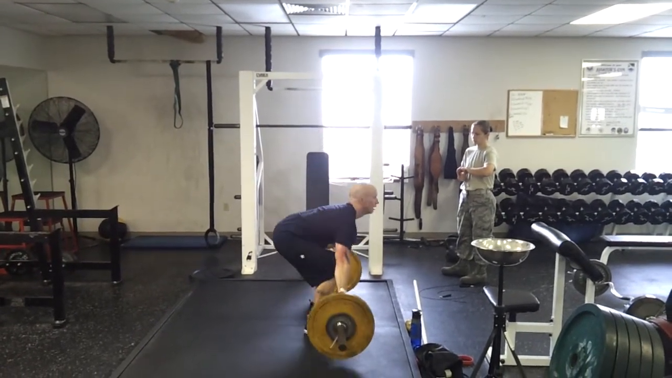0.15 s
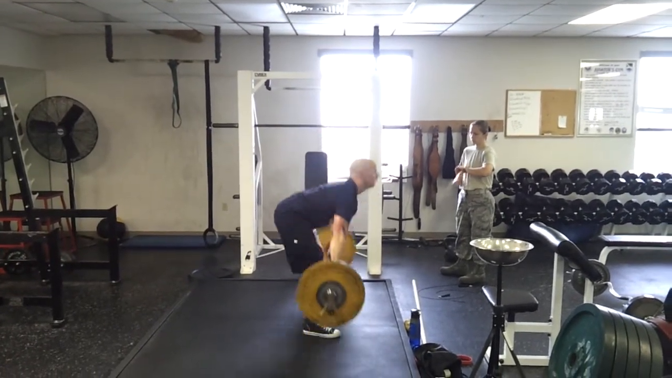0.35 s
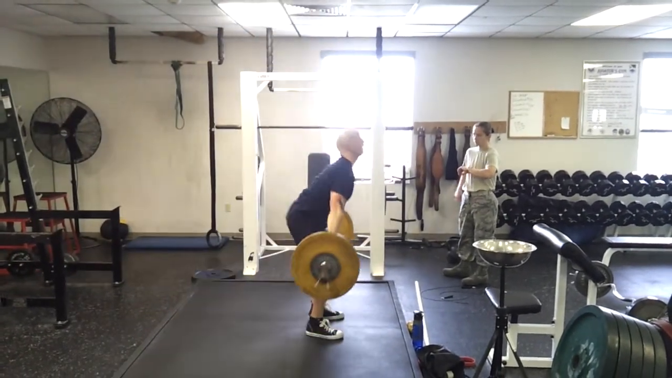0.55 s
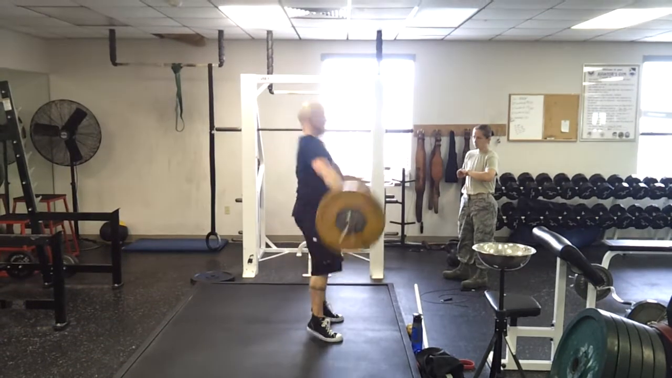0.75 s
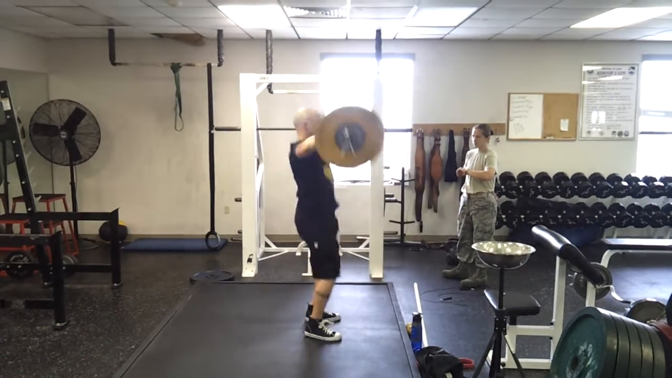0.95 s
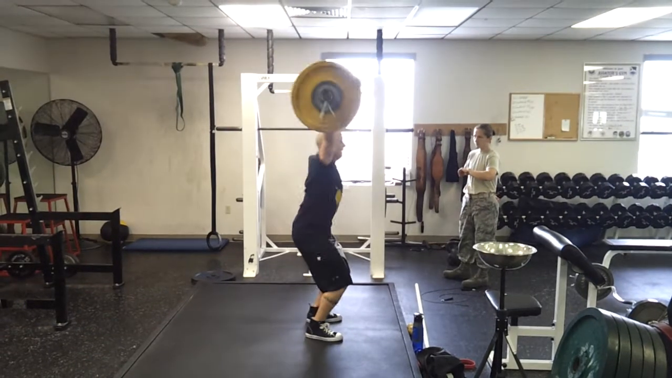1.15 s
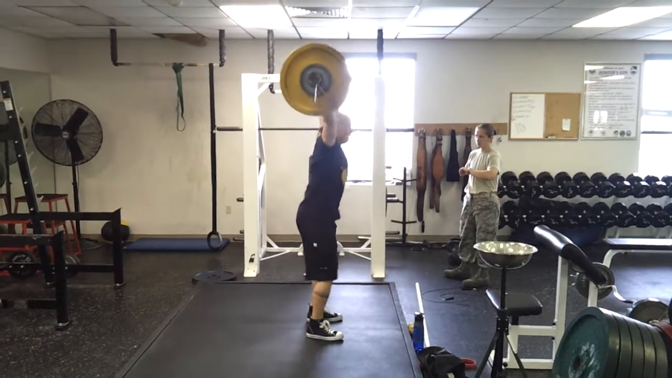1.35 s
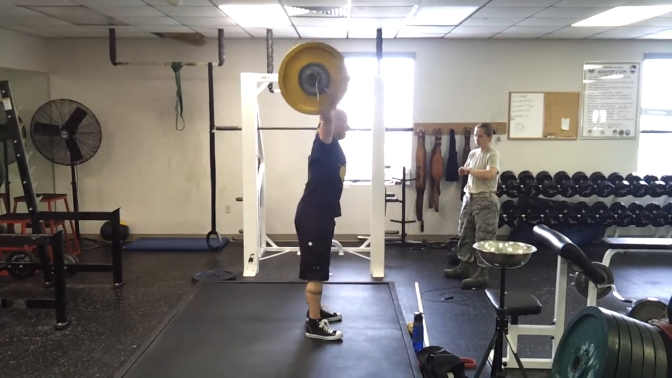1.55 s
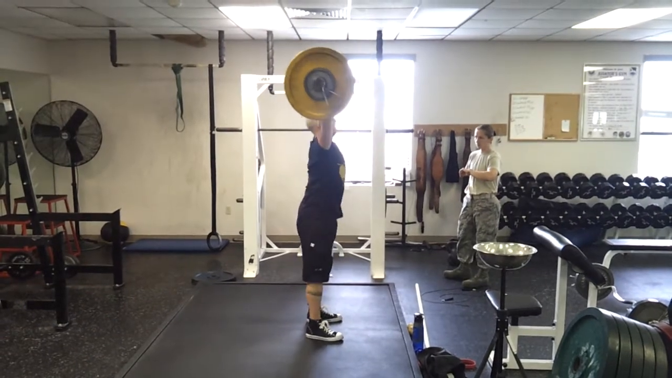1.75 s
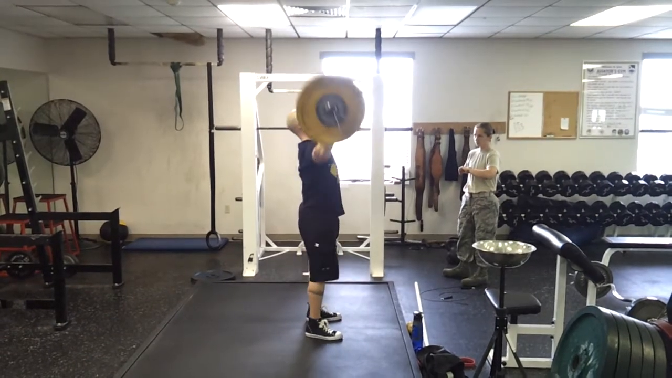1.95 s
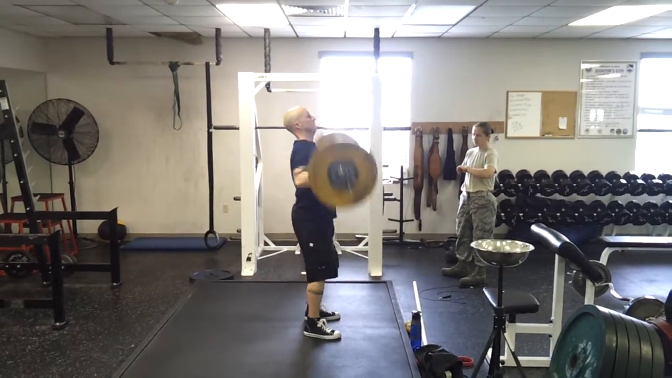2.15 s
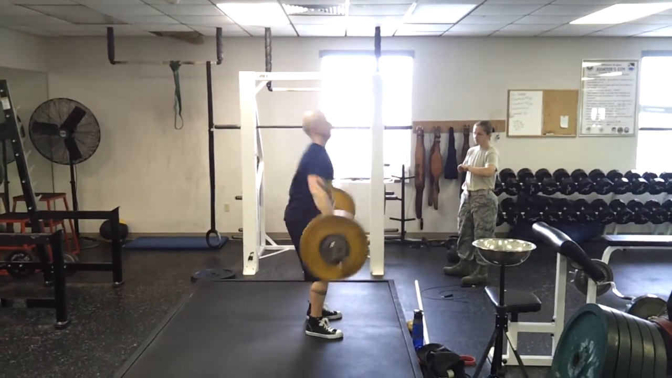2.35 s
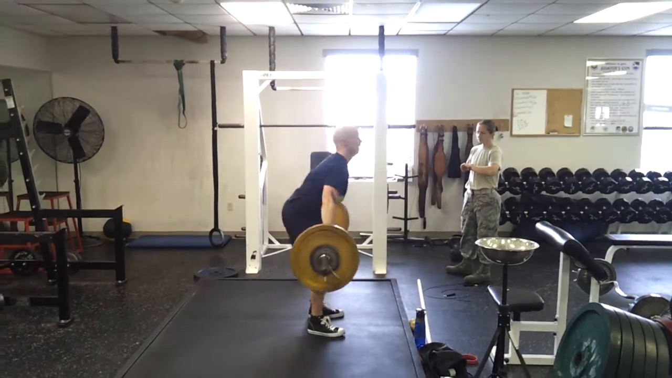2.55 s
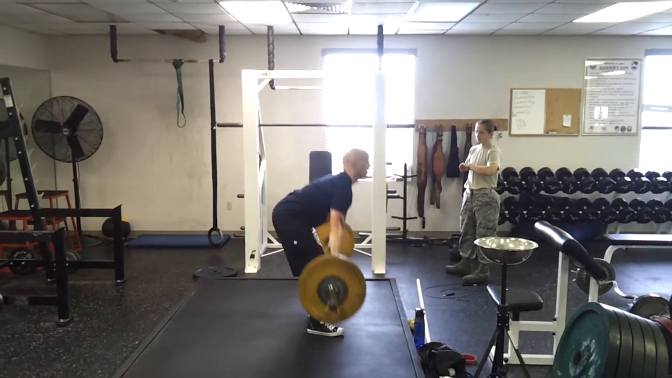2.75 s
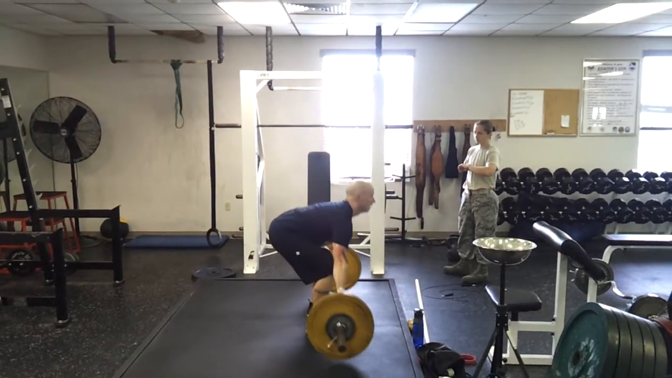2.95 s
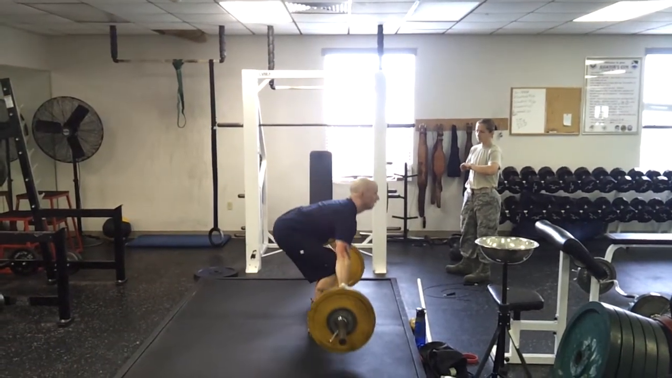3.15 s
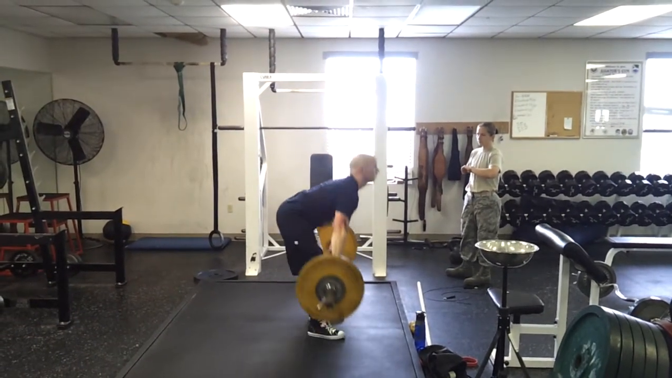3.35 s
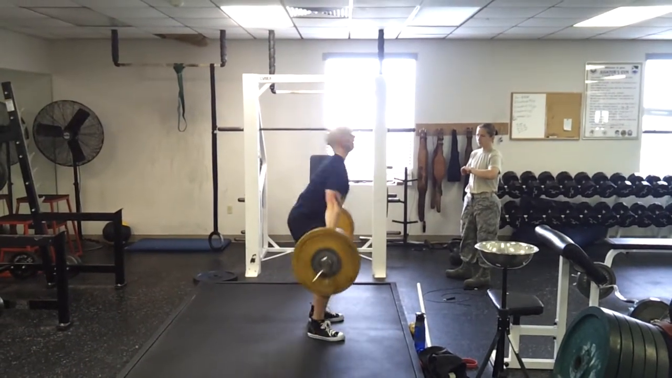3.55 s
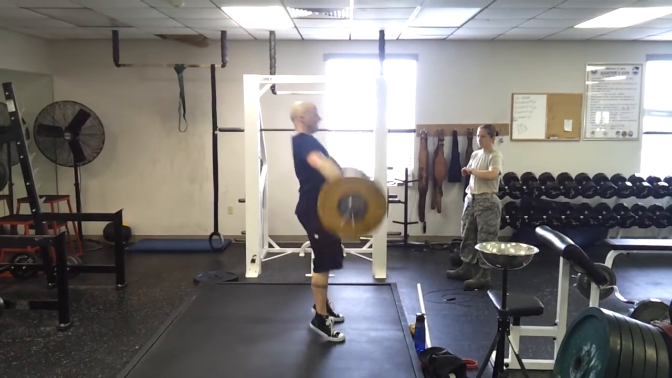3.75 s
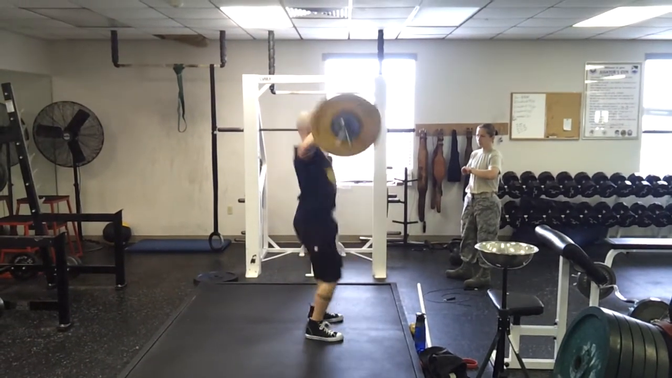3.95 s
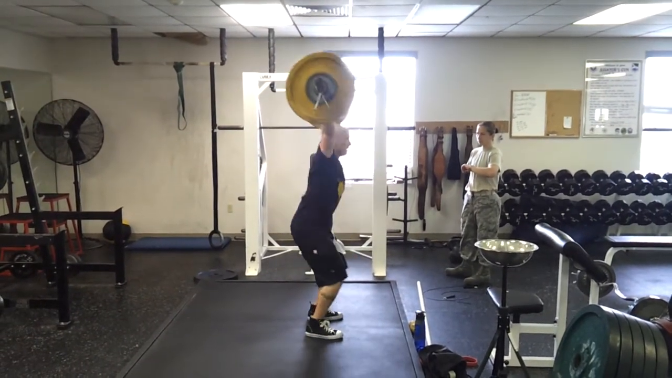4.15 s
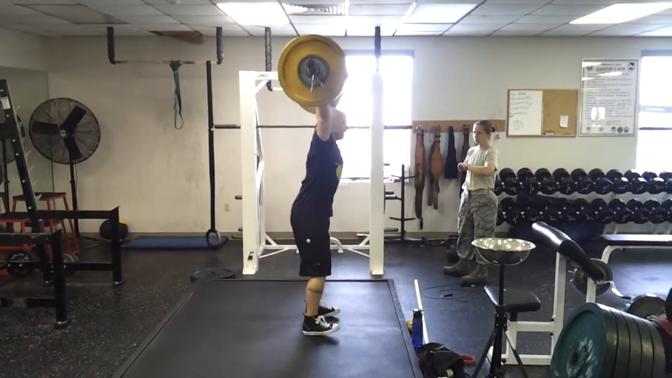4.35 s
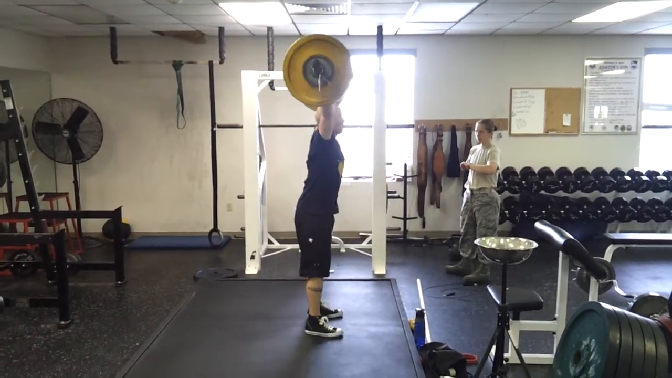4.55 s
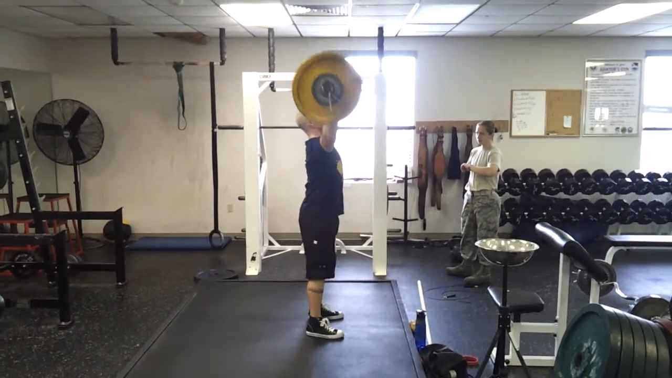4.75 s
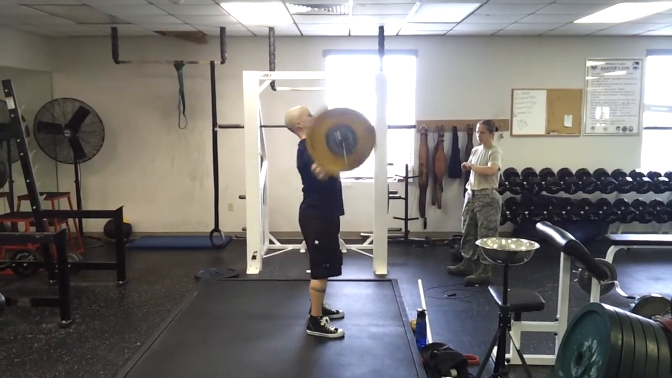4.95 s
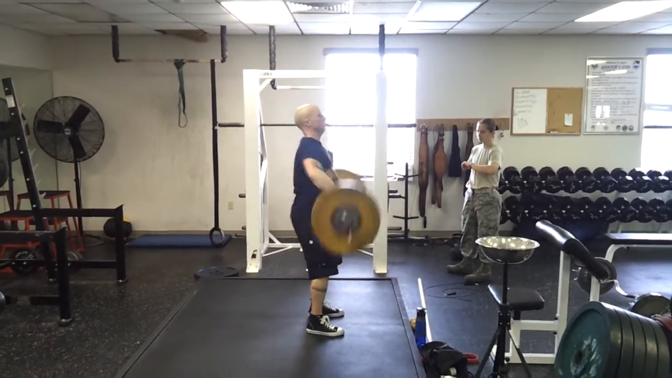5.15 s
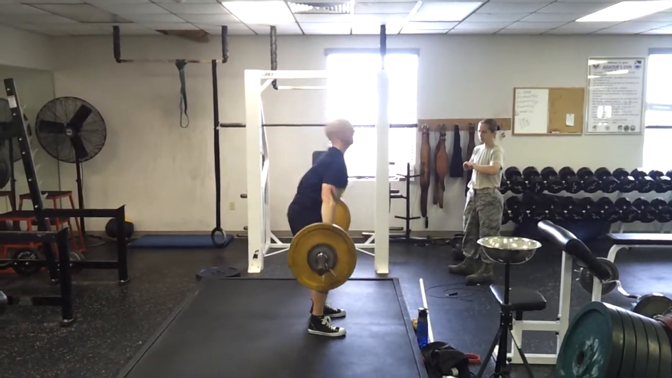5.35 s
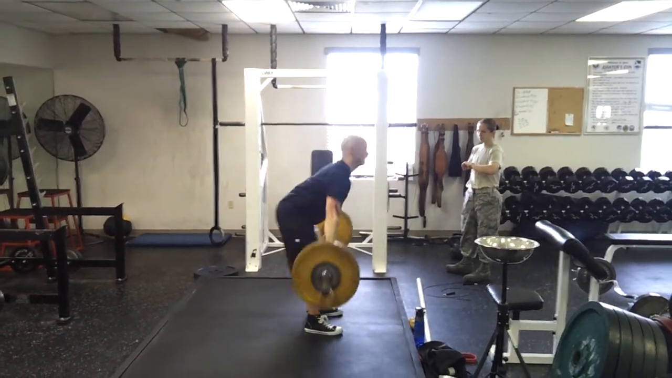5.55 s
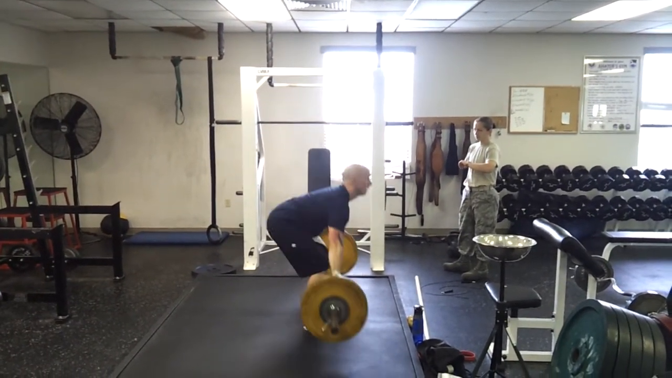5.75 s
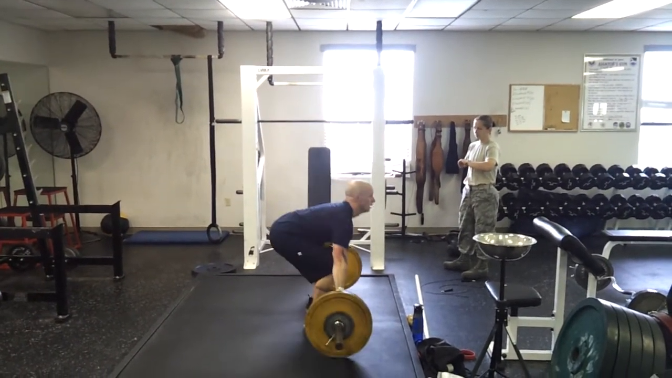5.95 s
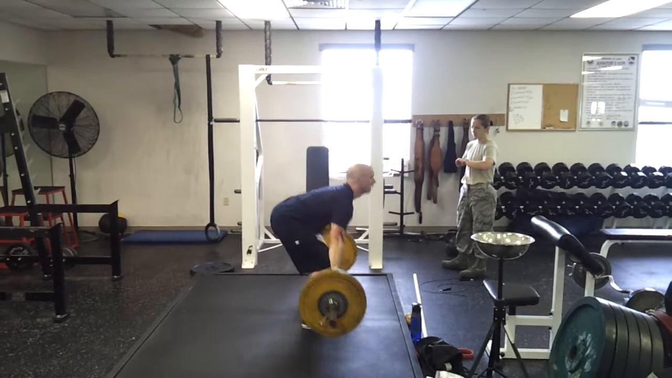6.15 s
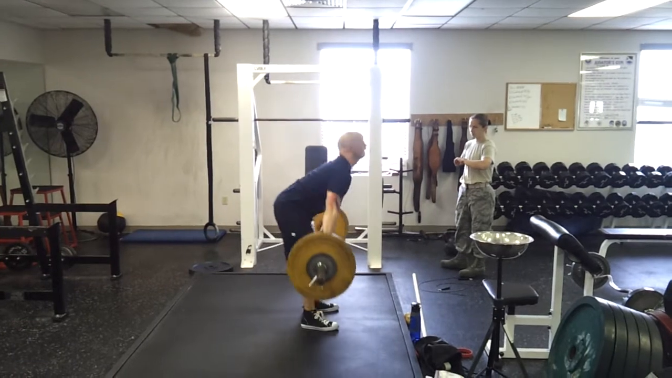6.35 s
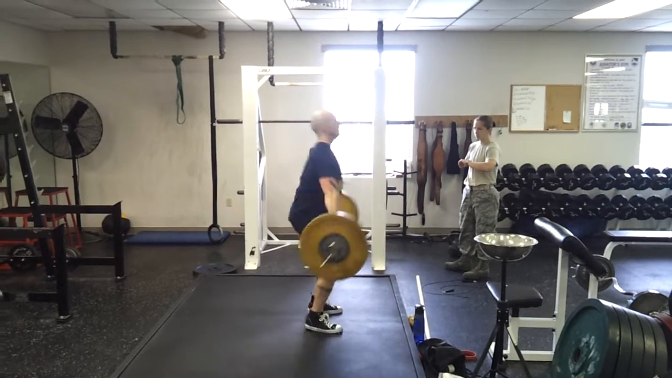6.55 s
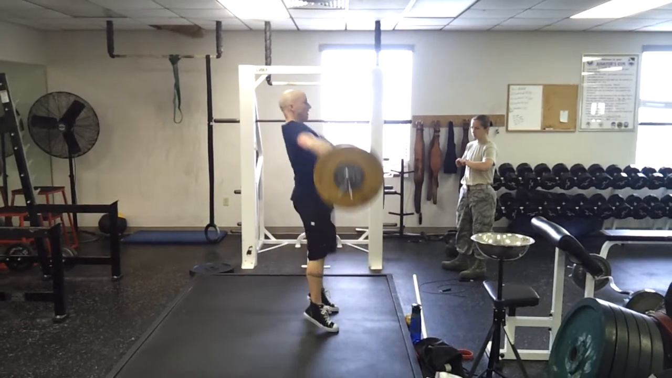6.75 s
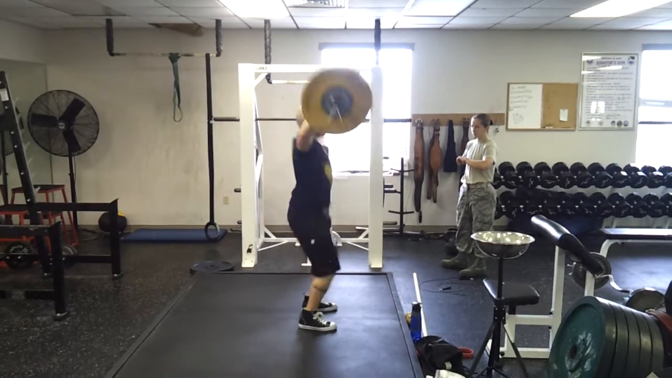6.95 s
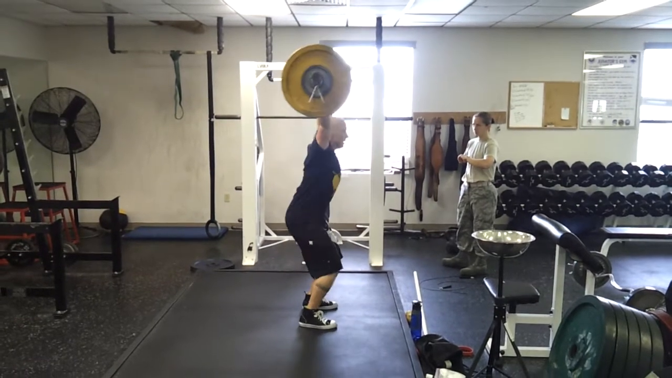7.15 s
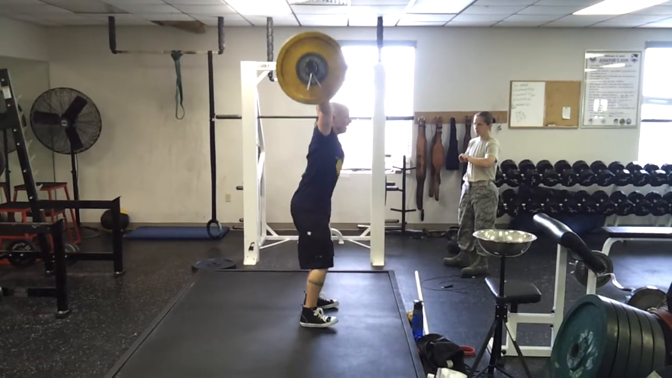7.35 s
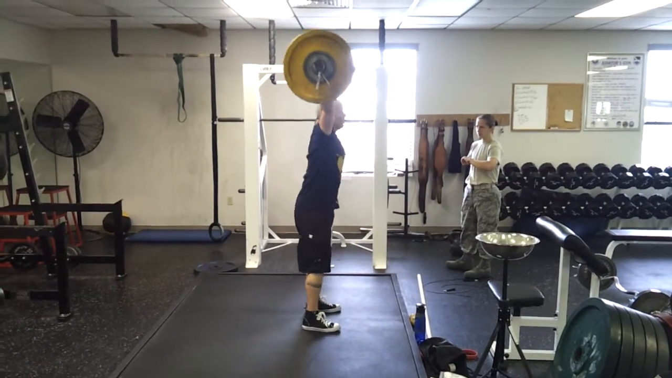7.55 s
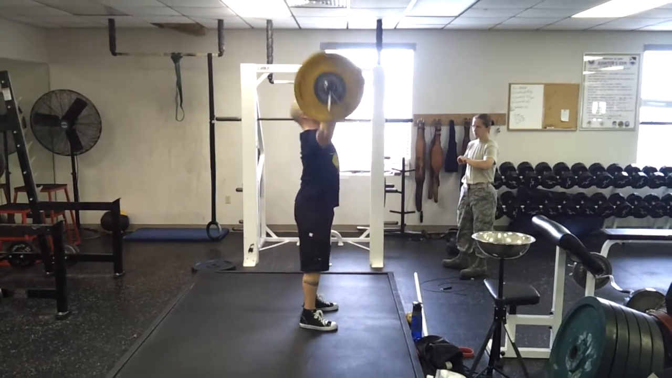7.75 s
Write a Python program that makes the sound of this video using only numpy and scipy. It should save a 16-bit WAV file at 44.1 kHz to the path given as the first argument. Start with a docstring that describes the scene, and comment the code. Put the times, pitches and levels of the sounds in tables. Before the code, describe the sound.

In a hard, reverberant gym, a barbell slams onto rubber at the start, then twice more about three seconds apart. Each double crash overloads the microphone and rebounds with bright steel clatter. Between slams come a soft hip knock, plate rattles overhead and on the way down, pinging collars and brief squeaks. Ventilation rushes and hums steadily beneath.

```python
"""A rubber-plated barbell crashes on a rubber platform, loud enough to overload the microphone.
The hard-walled gym answers; the barbell is snatched three times. Filtered noise rattles and rings the steel.
Plates slide, knock at the hips and rattle overhead and on the way down; collars ping, the bar note beats.
Sleeves whistle as they slip, stray plates clink, and ventilation rushes and hums throughout."""
import sys
import numpy as np
from scipy import signal
from scipy.fft import rfft, irfft
from scipy.io import wavfile

SR = 44100
rng = np.random.default_rng(int(sys.argv[2]) if len(sys.argv) > 2 else 0)


def master(y):
    """Save y as 16-bit WAV."""
    cut = np.clip(np.atleast_2d(y).T, -1, 1)
    pcm = np.round(cut * 32767)  # scale
    wavfile.write(sys.argv[1], SR, pcm.astype(np.int16))


N = 343539
T_S = np.arange(SR) / SR  # the second that follows a blow
GRID_HZ = abs(np.fft.fftfreq(8192, 1 / SR))

# barbell landings, one end then the other: t/s, far-end lag/s, far-end level/dB, rebound level/dB,
# rebound length/s, bar note level/dB
DROPS = [(.060, 0.03, -5, -8, 0.048, -31.5), (3.015, .023, -6, -7, 0.024, -27.5),
         (5.958, .019, -3.5, -14, .07, -30.5)]
# bar bumped off the hips: t/s, knock level/dB, knock length/s, chatter level/dB, slide level/dB,
# collar level/dB, bar note level/dB
BUMPS = [(.636, -25.5, 0.0078, -38, -43.5, -29, -42), (3.602, -28, 0.0057, -32.5, -39.5, -30.5, -39),
         (6.574, -30, 0.017, -33.5, -38, -38, -49)]
# arms stopping the bar, overhead or on the way down: t/s, far-end lag/s, level/dB, rattle length/s,
# slide level/dB, near collar level/dB, far collar level/dB, bar note level/dB
JOLTS = [ (1.116, 0.017, -17.5, 0.049, -48, -28, -22.5, -29.5),
         (2.176, 0.015, -13.5, 0.047, -57, -26, -22, -48), (2.560, .010, -27, 0.029, -47, -31.5, -47, -55),
         (4.086, .021, -19, 0.034, -40.5, -41, -44, -55), (5.075, .013, -18.5, 0.047, -50, -31, -21, -40.5),
         (5.499, 0.02, -30.5, 0.069, -45, -37.5, -59, -42.5),
         (7.089, 0.031, -23, 0.046, -57, -58, -53, -60)]
# a loose plate clinking alone: t/s, level/dB, length/s, tilt/(dB per octave)
CLINKS = [(0.958, -46.5, .035, -0.5), (3.002, -44, 0.0045, -7.5), (4.765, -48.5, 0.0064, 3.5),
          (5.745, -44.5, .01, -8), (7.058, -34.5, 0.018, 0), (7.401, -42.5, .023, 6)]
# short whistling tones from the bar, sleeve squeaks and one faint high ping at 3.743 s: t/s, length/s, f/Hz,
# level/dB
WHISTLES = [(3.743, .018, 8730, -46), (4.108, .013, 3210, -30.5), (6.293, 0.14, 9500, -44),
            (6.581, 0.18, 4390, -43), (6.64, 0.065, 4780, -48.5), (7.146, 0.069, 8700, -33),
            (7.339, 0.12, 3415, -44), (7.34, .09, 2440, -54), (7.352, .09, 4100, -51)]
# resonances of steel sleeves and plate hubs: f/Hz, width/Hz, relative level/dB
STEEL_MODES = [(1209, 82, 6.5), (1388, 53, 2), (1570, 51, 2), (2216, 48, 0.5), (2485, 70, 0),
               (2840, 160, 3.5), (3107, 86, 11), (3567, 77, 4), (4010, 75, 5.5), (4375, 36.2, 5),
               (4777, 55, 4), (5250, 31, 6), (5543, 78, 6), (5795, 28, 3.5), (6214, 47, 7), (6676, 86, 3),
               (7126, 61, 2.5), (7660, 49, 2.5), (7880, 50, 1.5), (8250, 34, 4), (8720, 98, 0.5),
               (9100, 220, 5.5), (9950, 40, 4.5), (10570, 39, 2.5), (10350, 89, -0.5), (10910, 58, 3.5),
               (11740, 13.35, -21.5)]
# dull clatter beneath the resonances: f/Hz, relative density/(dB per Hz)
CLATTER = [(100, -25.5), (400, -15.5), (850, -5.5), (1300, -15), (1800, -2.5), (3000, -3), (4500, -8),
           (7500, -16.5), (10000, -24.5), (12000, -3)]
# dull knock of the platform: f/Hz, relative density/(dB per Hz)
THUD = [(20, -13.5), (70, -1), (160, -2.5), (350, -3), (650, -6), (1000, -14), (2000, -29.5), (8000, -67.5)]
# bending note of the bar in two planes that beat: f/Hz, relative level/dB, t60/s
BAR_MODES = [(1387, -0.5, 1.48), (1386, -1.5, 0.74)]
# short collar ring: ratio to its pitch, width/Hz, relative level/dB
COLLAR_MODES = [(1, 150, 4.5), (0.96, 250, -8), (1.3, 120, -12.5)]
# decay of the room: f/Hz, t60/s
ROOM_T60 = [(100, 0.49), (500, 0.57), (1500, 0.52), (3000, 0.5), (6000, 0.54), (9000, 0.51), (12000, 0.4)]
# ventilation rush: f/Hz, relative density/(dB per Hz)
AIR = [(12, -29.5), (20, -2.5), (64, -2.5), (82, -7), (151, -8.5), (192, -12.5), (231, -10), (335, -11.5),
       (426, -13.5), (585, -15.5), (724, -18.5), (2890, -34), (3480, -36), (9050, -42), (11500, -40),
       (15000, -83), (22000, -120)]

# near end's level and length, far end's length, tilt in dB per octave
LAND_DB, LAND_S, CRASH_S, CRASH_TILT_DB_OCT = -6, .027, 0.043, 1.17
REBOUND_LAG_S, REBOUND_TILT_DB_OCT = .067, 2.8  # plates come down again, brighter
THUD_DB, THUD_LEAD_S = -26.5, .005  # rubber touches just before steel
DROP_COLLAR_DB, DROP_COLLAR_S, DROP_COLLAR_HZ = -9, .013, 9340
BUMP_TILT_DB_OCT, CHATTER_LAG_S, CHATTER_S, CHATTER_TILT_DB_OCT = -4.5, .021, 0.019, -0.5
BUMP_COLLAR_S, BUMP_COLLAR_HZ = 0.0092, 9360
SPIN_S, SPIN_HZ, SPIN_DB = 0.014, 4130, -39.5
# near end relative to the far end; its rattle length in lags
NEAR_DB, NEAR_TILT_DB_OCT, NEAR_LENGTH_LAGS = -7, -1.3, 1.32
EVEN_DB, TILT_PER_DB = -19.5, 0.17  # harder jolts are brighter, softer ones duller
JOLT_COLLAR_S, JOLT_COLLAR_HZ = .012, 9070
SLIDE_STEP_S, SLIDE_GROWTH_DB, SLIDE_S, SLIDE_TILT_DB_OCT = .028, 5, 0.049, -.5
AIR_DB, HUM_HZ, HUM_DB = -36, 59.3, -45  # RMS levels; the hum's before it wavers
INPUT_EDGE_HZ, OUTPUT_EDGE_HZ = 11750, 15900


def drops():
    """Each end thuds and crashes in turn; the rebound sets the bar singing."""
    out = np.zeros(N)
    for t_s, lag_s, far_db, rebound_db, rebound_s, note_db in DROPS:
        for at_s, db, length_s in (t_s, LAND_DB, LAND_S), (t_s + lag_s, far_db, CRASH_S):
            add(out, at_s - THUD_LEAD_S, platform(THUD_DB))
            add(out, at_s, plates(db, length_s, CRASH_TILT_DB_OCT))
        add(out, t_s, collar(DROP_COLLAR_DB, DROP_COLLAR_S, DROP_COLLAR_HZ))
        rebound = plates(rebound_db, rebound_s, REBOUND_TILT_DB_OCT)
        add(out, t_s + REBOUND_LAG_S, rebound + bar(note_db))
    return out


def jolts():
    """Near plates touch first, then far ones take the full stop; each end slaps its collar."""
    out = np.zeros(N)
    for t_s, lag_s, db, length_s, slide_db, near_collar_db, far_collar_db, note_db in JOLTS:
        tilt = TILT_PER_DB * (db - EVEN_DB)
        out += slide(t_s, slide_db)
        add(out, t_s, plates(db + NEAR_DB, NEAR_LENGTH_LAGS * lag_s, tilt + NEAR_TILT_DB_OCT))
        add(out, t_s + lag_s, plates(db, length_s, tilt) + bar(note_db))
        for at_s, collar_db in (t_s, near_collar_db), (t_s + lag_s, far_collar_db):
            add(out, at_s, collar(collar_db, JOLT_COLLAR_S, JOLT_COLLAR_HZ))
    return out


def bumps():
    """Plates slide during the pull, knock once at the hips and chatter as the spun sleeves chirp."""
    out = np.zeros(N)
    for t_s, db, length_s, chatter_db, slide_db, collar_db, note_db in BUMPS:
        out += slide(t_s, slide_db)
        add(out, t_s, plates(db, length_s, BUMP_TILT_DB_OCT))
        add(out, t_s, collar(collar_db, BUMP_COLLAR_S, BUMP_COLLAR_HZ))
        add(out, t_s, bar(note_db))
        add(out, t_s, sleeve(SPIN_DB, SPIN_S, SPIN_HZ))
        add(out, t_s + CHATTER_LAG_S, plates(chatter_db, CHATTER_S, CHATTER_TILT_DB_OCT))
    return out


def handling():
    """Stray clinks, squeaks and a faint high ping while the bar is carried."""
    out = np.zeros(N)
    for t_s, db, length_s, tilt_db_oct in CLINKS:
        add(out, t_s, plates(db, length_s, tilt_db_oct))
    for t_s, length_s, hz, db in WHISTLES:
        add(out, t_s, sleeve(db, length_s, hz))
    return out


def slide(knock_s, last_db, count=3):
    """Plates slip along the sleeve, louder and louder, up to a knock."""
    out = np.zeros(N)
    for k in range(count):  # backward from the last slip
        slip = plates(last_db - k * SLIDE_GROWTH_DB, SLIDE_S, SLIDE_TILT_DB_OCT)
        add(out, knock_s - (k + 1) * SLIDE_STEP_S, slip)
    return out


def plates(db, length_s, tilt_db_oct, free_db=-10, damping_hz_per_db=3):
    """A rattle rings the steel; only hard blows shake it free of the damping rubber."""
    steel = ring(STEEL_MODES, damping_hz_per_db * max(free_db - db, 0))
    tilt = shape([(750, -2 * tilt_db_oct), (12000, 2 * tilt_db_oct)])  # four octaves
    gain = np.hypot(shape(CLATTER), steel) * tilt
    return room(burst(colour(rattle(length_s), gain), db), wet_db=5.5)


def rattle(length_s, contacts_per_s=400, contact_t60_s=0.02, scrape=0.1):
    """Gritty contacts over a scrape: noise in a rising and falling envelope."""
    contacts = (rng.random(SR) < contacts_per_s / SR) * rng.exponential(1, SR)
    power = abs(convolve(contacts, dying(contact_t60_s) ** 2))
    rise = 1 - np.exp(-5 * T_S / length_s)
    fall = np.exp(-(T_S / length_s) ** 2)
    grit = np.sqrt(power / power.mean() + scrape)
    return rise * fall * grit * rng.standard_normal(SR)


def platform(db, thud_t60_s=0.084):
    """Rubber on rubber: decaying noise, a dull push with no ring."""
    push = rng.standard_normal(SR) * dying(thud_t60_s)
    return burst(room(colour(push, shape(THUD)), wet_db=3.5), db)


def collar(db, length_s, hz, slaps_per_s=1200):
    """A collar faces the microphone, so its bright buzzing ping is drier than the plates."""
    gain = ring([(ratio * hz, width_hz, level_db) for ratio, width_hz, level_db in COLLAR_MODES])
    return room(burst(colour(rattle(length_s, slaps_per_s), gain), db), wet_db=-2)


def bar(db, rise_s=0.0052):
    """One long beating note that flutters as the bar moves through the room."""
    note = sum(amp(level_db) * dying(t60_s) * np.exp(2j * np.pi * hz * T_S)
               for hz, level_db, t60_s in BAR_MODES)
    sway = 1 + .18 * (drift(SR, hz=16) + 1j * drift(SR, hz=16))
    return amp(db) * (1 - np.exp(-T_S / rise_s)) * (sway * note).real


def sleeve(db, length_s, hz, wobble=0.0086):
    """Steel slipping on steel: a short whistle of unsteady pitch."""
    cycles = np.cumsum(hz * (1 + wobble * drift(SR, hz=250))) / SR
    envelope = np.sin(np.pi * np.minimum(T_S / length_s, 1))
    return burst(room(envelope * np.sin(2 * np.pi * cycles), wet_db=-10), db)


def room(x, wet_db, build_s=0.00069):
    """Direct sound plus a diffuse tail, new at each call, scaled to about the same energy."""
    hz, t_s, z = signal.stft(rng.standard_normal(SR), SR, nperseg=256)
    z = z * 1000 ** (-t_s / read(ROOM_T60, hz)[:, None])
    tail = signal.istft(z, SR)[1][:SR] * (1 - np.exp(-T_S / build_s))
    wet = amp(wet_db) * convolve(x, unit(tail))
    return (x + wet) / np.hypot(1, amp(wet_db))


def ventilation(waver=.35):
    """A steady rush of filtered noise over an uneven motor hum."""
    rush = amp(AIR_DB) * np.sqrt(N) * unit(colour(rng.standard_normal(N), shape(AIR)))
    sway = 1 + waver * (drift(N, hz=3) + 1j * drift(N, hz=3))
    hum = (sway * np.exp(2j * np.pi * HUM_HZ * np.arange(N) / SR)).real
    return rush + amp(HUM_DB) * np.sqrt(2) * hum


def amp(db):
    """Decibels to gain."""
    return 10 ** (np.asarray(db) / 20)


def unit(x):
    """Scales to an energy of one."""
    return x / np.sqrt(np.sum(x ** 2) + 1e-20)


def burst(x, db):
    """Scales to the energy of a tenth of a second at this RMS level."""
    return amp(db) * np.sqrt(SR / 10) * unit(x)


def read(points, hz):
    """Joins points by straight lines over log frequency."""
    f_hz, value = np.transpose(points)
    return np.interp(np.log(hz + 1), np.log(f_hz + 1), value)


def shape(points):
    """Gain of a smooth spectrum on GRID_HZ."""
    return amp(read(points, GRID_HZ))


def ring(modes, damping_hz=0):
    """Gain of a set of resonances; damping makes each wider and lower."""
    hz, width_hz, db = np.transpose(modes)[:, :, None]
    damped_hz = width_hz + damping_hz
    power = amp(db) ** 2 * width_hz / damped_hz / (1 + (2 * (GRID_HZ - hz) / damped_hz) ** 2)
    return np.sqrt(np.sum(power, axis=0))


def colour(x, gain):
    """Minimum-phase filter with this gain at each frequency of GRID_HZ."""
    spectrum = np.exp(np.conj(signal.hilbert(np.log(gain))))
    taps = np.fft.ifft(spectrum).real
    return convolve(x, taps[:len(taps) // 2])


def convolve(x, response):
    """Passes x through a response and keeps its length."""
    return signal.fftconvolve(x, response)[:len(x)]


def dying(t60_s):
    """A second of decay, 60 dB down after t60_s."""
    return 1000 ** (-T_S / t60_s)


def drift(count, hz):
    """Slow random wander of unit RMS."""
    low = np.exp(-(np.fft.rfftfreq(count, 1 / SR) / hz) ** 2)
    return unit(irfft(rfft(rng.standard_normal(count)) * low, count)) * np.sqrt(count)


def add(mix, t_s, sound):
    """Mixes a sound in at t_s, cut at the end of the mix."""
    part = mix[max(round(t_s * SR), 0):][:len(sound)]
    part += sound[:len(part)]


def scene():
    """The barbell and the gym at one microphone."""
    return (drops() + jolts() + bumps() + handling() + ventilation())[None]


def low_pass(x, hz):
    """Steep linear-phase cut above hz."""
    taps = signal.firwin(511, hz, window=("kaiser", 9), fs=SR)
    return signal.oaconvolve(x, taps[None], "same")


def record(dry, splash_db=-5):
    """A narrow input band, hard overload that splashes weakly above it, then the band limit."""
    fine = signal.resample_poly(low_pass(dry, INPUT_EDGE_HZ), 3, 1, axis=1)  # oversampled clipping
    clipped = signal.resample_poly(np.clip(fine, -.65, .65), 1, 3, axis=1)
    band = low_pass(clipped, INPUT_EDGE_HZ + 150)
    splash = clipped - band
    return low_pass(band + amp(splash_db) * splash, OUTPUT_EDGE_HZ)


dry = scene()
out = record(dry)
master(out)
```